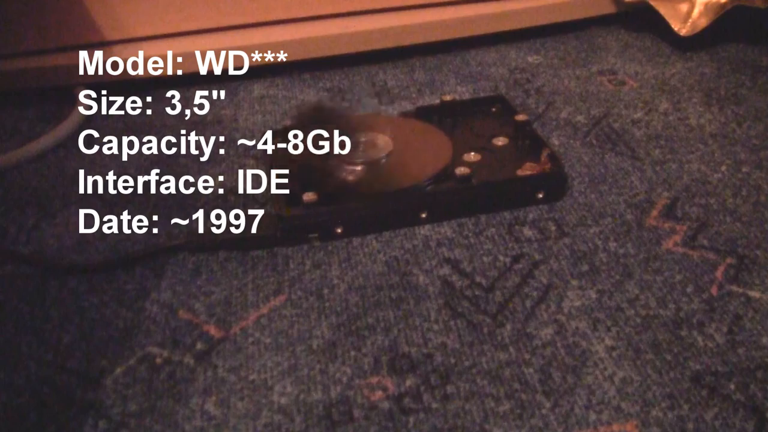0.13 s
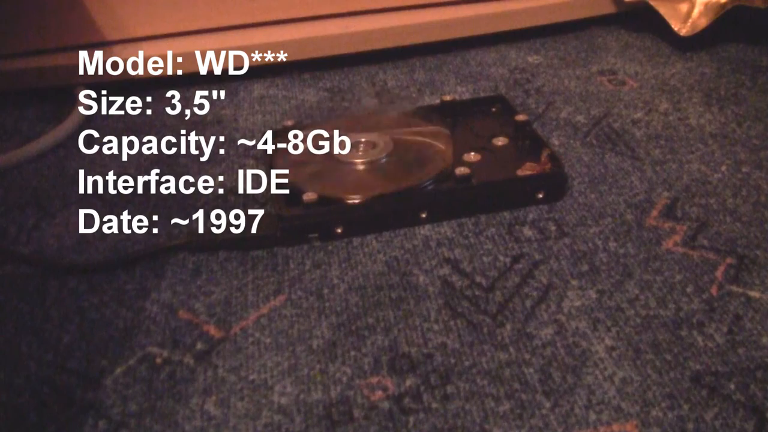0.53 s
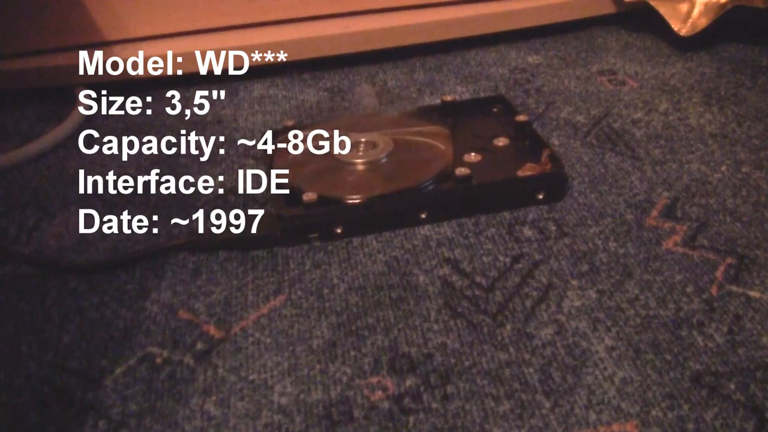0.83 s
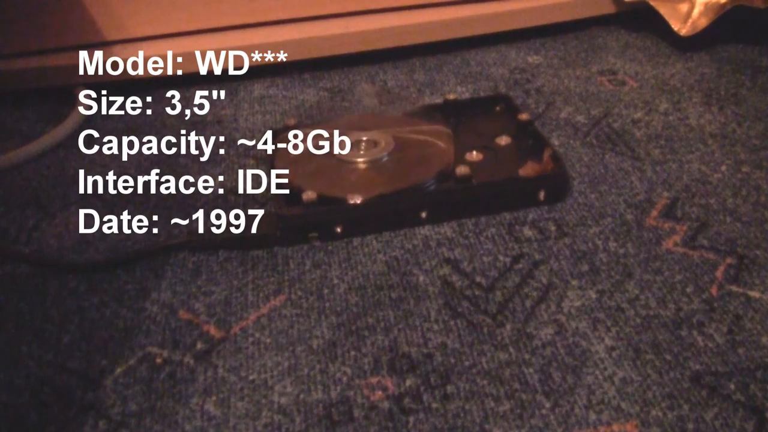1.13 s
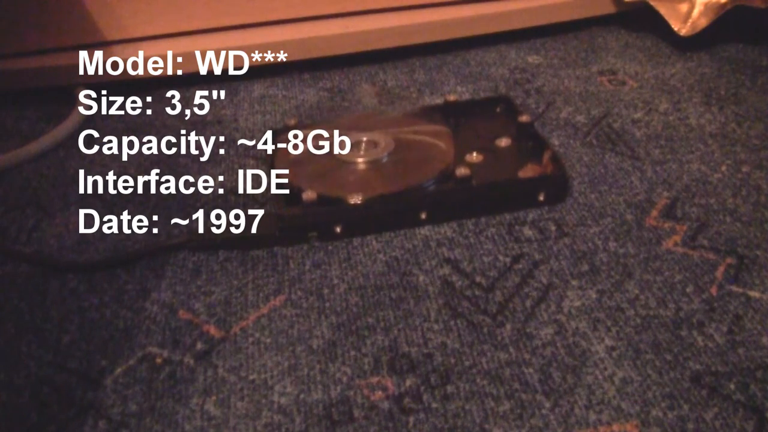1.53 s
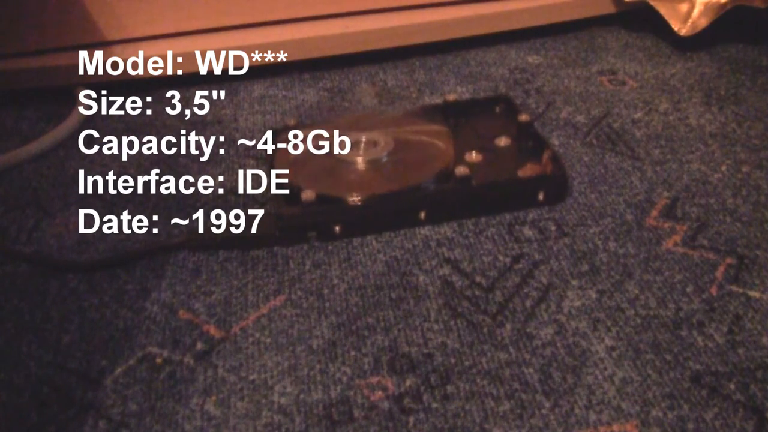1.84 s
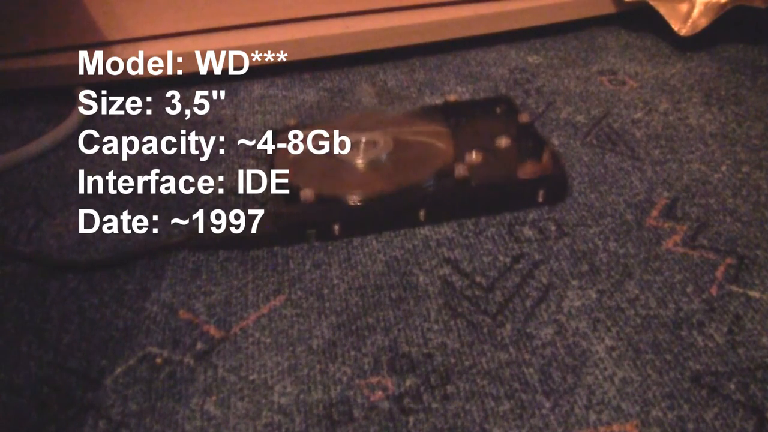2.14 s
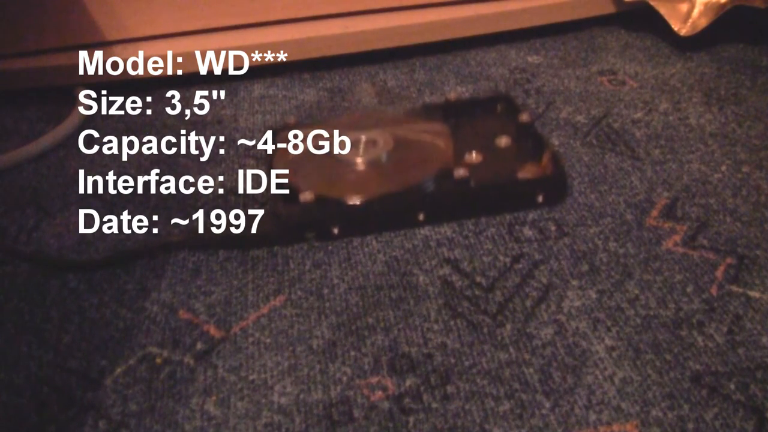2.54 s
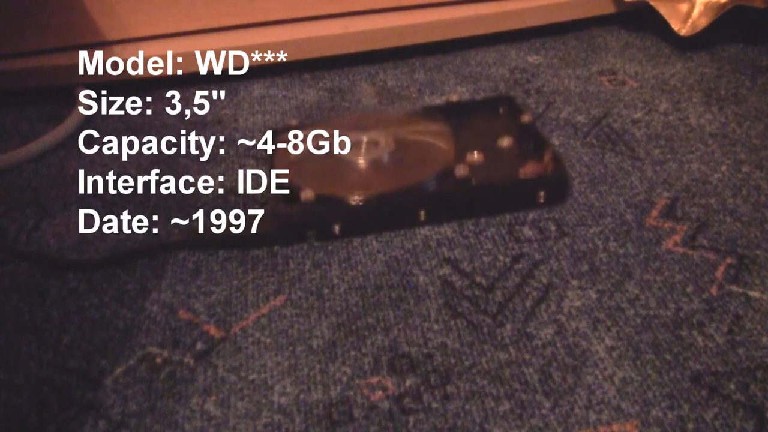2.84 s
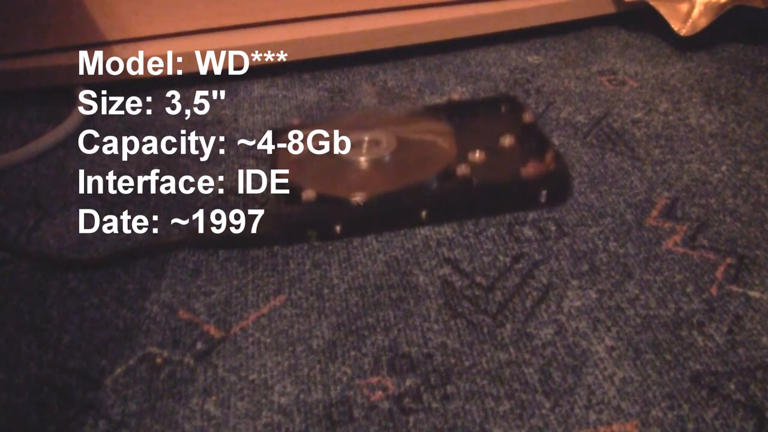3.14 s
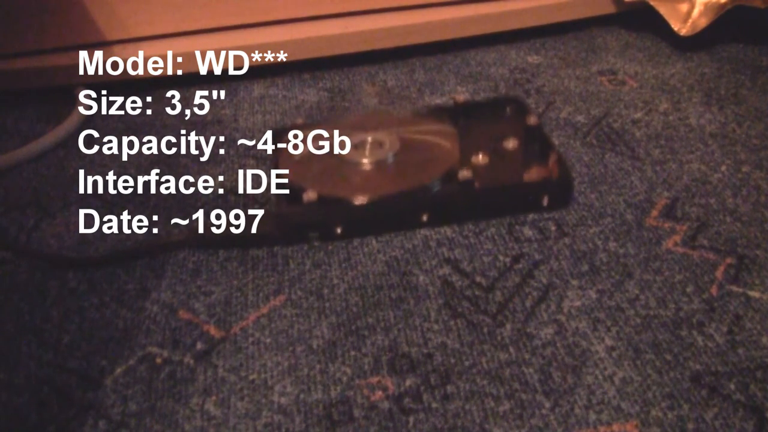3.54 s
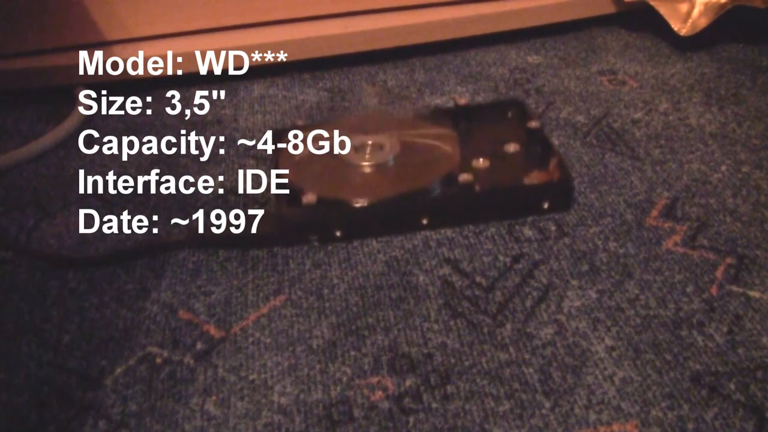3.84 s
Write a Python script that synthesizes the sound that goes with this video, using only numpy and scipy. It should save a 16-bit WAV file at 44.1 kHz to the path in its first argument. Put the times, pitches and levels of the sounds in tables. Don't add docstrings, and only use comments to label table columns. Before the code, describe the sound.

An opened hard drive starts up close to the microphone in a quiet room. After brief silence, faint hiss, thin high whistling and tiny ticks begin around 0.2 seconds, with a short scrape near 0.5. The platter then accelerates, its grinding whine and hum rising in pitch and loudness until about 2.5 seconds, then nearly levelling into a rough, hissing roar. Fluttering air and low thuds punctuate it, mostly after 2.3 seconds.

```python
import sys
import numpy as np
from scipy import signal
from scipy.fft import rfft, irfft, next_fast_len
from scipy.io import wavfile
from scipy.ndimage import uniform_filter1d, map_coordinates

SR = 44100
rng = np.random.default_rng(int(sys.argv[2]) if len(sys.argv) > 2 else 0)


def transcribe(u):
    v = np.clip(np.atleast_2d(u).T, -1, 1)
    q = np.round(v * 32767).astype(np.int16)
    wavfile.write(sys.argv[1], SR, q)


def gain_from_decibels(decibels):
    exponent = np.asarray(decibels, float) / 20
    return 10 ** exponent


N = 176400
TIME = np.arange(N) / SR
BALLS_PER_TURN = 4.83

# frequency in Hz, level in dB per Hz.
GRIND_COLOUR = [(530, -23), (900, -2), (1560, -5), (2070, -3), (2250, -3), (3180, 1), (4180, -1.5),
                (5020, -3), (8000, -16.5), (10400, -20), (17600, -120)]


def unit(x):
    return x / np.sqrt(np.mean(x ** 2) + 1e-20)


def along(points, hz):
    f, v = np.transpose(points)
    return np.interp(np.log(hz + 1), np.log(f + 1), v)


def wobble(rate):
    coarse = np.arange(0, N + 16, 16)
    knots = rng.standard_normal(int(N * rate / SR) + 4)
    curve = map_coordinates(knots, [coarse * rate / SR], mode="nearest")
    return np.interp(np.arange(N), coarse, curve)


def unsteady_tone(phase, width_hz):
    return unit(wobble(width_hz) * np.sin(phase) + wobble(width_hz) * np.cos(phase))


def filtered(x, response):
    m = next_fast_len(N + SR // 2)
    return irfft(rfft(x, m) * response(np.fft.rfftfreq(m, 1 / SR)), m)[..., :N]


def noise(spectrum, patchy_db):
    z = signal.stft(rng.standard_normal(N), nperseg=512)[2]
    patches = uniform_filter1d(rng.standard_normal(z.shape), size=5, axis=0)
    patches = uniform_filter1d(patches, size=10, axis=1)
    x = signal.istft(z * gain_from_decibels(patchy_db * unit(patches)), nperseg=512)[1][:N]
    return unit(filtered(x, lambda hz: gain_from_decibels(along(spectrum, hz))))


def room():
    # frequency in Hz, level in dB per Hz.
    colour = [(15, -54), (25, -15), (129, -3.5), (202, -3), (242, -1), (358, -11), (502, -9), (1040, -13.5),
              (12800, -33), (16600, -68), (22000, -120)]
    # frequency in Hz, likeness (1 is the same).
    likeness = [(60, 0.91), (170, 0.88), (500, 0.055), (1460, 0.034), (4250, 0.41), (12300, 0.18)]

    def angle(hz):
        return np.arccos(np.clip(along(likeness, hz), -1, 1)) / 2

    mid = filtered(noise(colour, patchy_db=1.0), lambda hz: np.cos(angle(hz)))
    side = filtered(noise(colour, patchy_db=3.0), lambda hz: np.sin(angle(hz)))
    return gain_from_decibels(-49.5) * np.array([mid + side, mid - side])


def driver_whistle():
    # frequency in Hz, width in Hz, level in dB.
    lines = [(7130, 90, -69), (7760, 60, -71), (8640, 120, -72), (10500, 500, -73), (12500, 300, -82)]
    start_s = .212
    total = sum(gain_from_decibels(db) * unsteady_tone(2 * np.pi * hz * TIME, width) for hz, width, db in lines)
    return total * (TIME > start_s)


def coil_ticks():
    # start in seconds, level in dB.
    snaps = [
        (.212, -60),
        (.247, -57),
        (.262, -59),
        (.275, -55),
        (.313, -52),
        (.33, -48),
        (.342, -54),
        (.39, -56),
        (.56, -47),
    ]
    # frequency in Hz, level in dB.
    colour = [(1500, -20), (3500, 12), (6000, -10), (9000, -2), (11000, -9), (14000, -13)]
    fade_s = 0.0078
    level = sum(gain_from_decibels(db - 60 * np.abs(TIME - s) / fade_s) * (TIME > s) for s, db in snaps)
    return level * unit(filtered(rng.standard_normal(N), lambda hz: gain_from_decibels(along(colour, hz))))


def platter_scrape():
    # frequency in Hz, level in dB per Hz.
    colour = [(180, -27), (300, -5), (411, -5), (458, -17), (553, -11), (914, -6), (3810, -11.5),
              (12800, -35), (16600, -62), (22000, -120)]
    # middle in seconds, half length in seconds, level in dB.
    strokes = [
        (0.39, 0.012, -50.5),
        (0.492, 0.041, -43),
    ]
    level = sum(gain_from_decibels(db) * np.exp(-.5 * ((TIME - s) / half) ** 2) for s, half, db in strokes)
    roughness = gain_from_decibels(1.5 * wobble(170))
    return level * unit(noise(colour, patchy_db=1.2) * roughness)


def spin():
    # time in seconds, balls passing in Hz, bearing load in dB.
    speed_up = [(0.8, 97.3, -4), (0.85, 110.2, -2), (1.16, 172, 1.5), (1.37, 206, 2), (1.52, 230.3, 2),
                (1.74, 261.3, 1.5), (2.06, 299.5, 0.5), (2.64, 334.7, 0.5), (2.98, 347.5, -0.5),
                (3.46, 358.9, 0), (4.0, 362, -0.5)]
    start_s = .5
    s, hz, load_db = np.transpose([(start_s, 1, 0)] + list(speed_up))
    ball_hz = uniform_filter1d(np.interp(TIME, s, hz), size=SR // 8, mode="nearest")
    turn_hz = ball_hz / BALLS_PER_TURN
    speed_db = 20 * np.log10(turn_hz / turn_hz.max())
    return np.cumsum(turn_hz) / SR, speed_db, np.interp(TIME, s, load_db)


def rim_hiss(speed_db):
    # frequency in Hz, level in dB per Hz.
    colour = [(2940, -37), (5000, 5), (5900, -7), (6760, -4), (8040, -13.5), (8870, -8.5), (10000, -12.5),
              (12800, -30), (16600, -68), (22000, -120)]
    top_hz = 12700
    hiss = filtered(noise(colour, patchy_db=3.1), lambda hz: 1 / (1 + (hz / top_hz) ** 40))
    return hiss * gain_from_decibels(-28.5 + 6.64 * speed_db + 0.27 * wobble(29.9))


def air_thuds():
    # middle in seconds, peak level in dB, pitch in Hz.
    thuds = [(1.234, -25, 181), (1.261, -20, 250), (1.274, -24, 200), (1.286, -17, 298), (1.309, -25, 200),
             (1.335, -24, 180), (1.386, -20, 334), (2.355, -8, 447), (2.419, -9, 502.7),
             (2.611, -10.5, 380), (2.644, -8, 448), (2.71, -7.5, 334), (2.89, -15, 480),
             (3.146, -6.5, 448.4), (3.567, -6.5, 453)]
    total = np.zeros(N)
    for s, db, hz in thuds:
        v = np.pi * hz * (TIME - s)
        total -= gain_from_decibels(db) * (1 - 2 * v * v) * np.exp(-v * v)
    return total


def air_flap(turns, speed_db):
    # frequency in Hz, level in dB per Hz.
    colour = [(24, -39), (40, -23.5), (102, -4), (145, -7.5), (194, -3), (619, 0), (1050, -14),
              (1170, -8.5), (1800, -18.5), (2340, -48), (3960, -120)]
    lumps = gain_from_decibels(0.5 * wobble(90) - 0.5 * wobble(11))
    once_a_turn = 1 + 0.068 * np.cos(2 * np.pi * turns)
    flap = unit(noise(colour, patchy_db=1.5) * lumps * once_a_turn)
    return flap * gain_from_decibels(-20.5 + 3.36 * speed_db)


def platter_hum(turns, speed_db):
    # multiple of the turning rate, level in dB.
    orders = [(1, -34.5), (1.5, -40.5), (2, -29), (3, -37), (5, -43), (6, -36), (7, -38), (8, -41),
              (16, -78)]
    # frequency in Hz, gain in dB.
    carpet = [(50, -9), (66, -3), (78, -0.5), (90, 1.5), (100, -5.5), (113, 1.5), (150, 2), (700, 4)]
    grows, overtone_grows = 2.25, 0.19
    hum = np.zeros(N)
    for k, db in orders:
        level_db = db + overtone_grows * k * speed_db + 1.2 * wobble(9.2)
        hum += np.sqrt(2) * gain_from_decibels(level_db) * np.sin(2 * np.pi * k * turns + rng.uniform(0, 6.27))
    return filtered(hum * gain_from_decibels(grows * speed_db), lambda hz: gain_from_decibels(along(carpet, hz)))


def casting(hz):
    # frequency in Hz, width in Hz, gain in dB.
    rings = [(1180, 160, -3.5), (1695, 27, 12), (1930, 63, 7), (2014, 17, 11), (2101, 94, 8), (2530, 35, 9),
             (2790, 63, 9.5), (3092, 104, 7), (3257, 110, 6.5), (3528, 140, 10), (3880, 210, 9),
             (4580, 310, 6), (4946, 33, 4.5), (6840, 160, 8.5)]
    peaks = sum((gain_from_decibels(db) ** 2 - 1) / (1 + (2 * (hz - centre) / width) ** 2) for centre, width, db in rings)
    return np.sqrt(1 + peaks)


def bearing_grind(speed_db, load_db):
    grind_db, rub_db, rub_s = -21.5, -58, 0.525
    bright_hz = 2550
    grind = unit(filtered(noise(GRIND_COLOUR, patchy_db=0.5), casting))
    grind = grind * gain_from_decibels(grind_db + .4 * wobble(4.4) + 0.9 * wobble(70))
    dull = filtered(grind, lambda hz: 1 / (1 + (hz / bright_hz) ** 4))
    bright = grind - dull
    rub = bright * gain_from_decibels(rub_db - grind_db) * np.clip((TIME - rub_s) / 0.04, 0, 1)
    rolling = dull + bright * gain_from_decibels(1.28 * speed_db)
    return rolling * gain_from_decibels(1.62 * speed_db + load_db) + rub


def bearing_whine(turns, speed_db, load_db):
    # multiple of the ball rate, level in dB.
    main_orders = [(6, -39), (7, -42), (8, -41), (9, -38), (11, -47)]
    low_hz = 1540
    phase = 2 * np.pi * BALLS_PER_TURN * turns + 0.052 * wobble(40)
    orders = [(k, db + 1.2 * speed_db) for k, db in main_orders]
    orders += [(k, -53 + 0.4 * speed_db) for k in (10, *range(12, 24))]
    tones = sum(gain_from_decibels(db + 2.6 * wobble(9)) * np.sin(k * phase + k * k) for k, db in orders)
    swing = 1 + 2 * gain_from_decibels(-14) * np.cos(2 * np.pi * turns)

    def tone_path(hz):
        ringing = casting(hz) ** 1.5
        return ringing * gain_from_decibels(along(GRIND_COLOUR, hz)) / (1 + (low_hz / (hz + 1)) ** 8)

    tones = filtered(tones * swing, tone_path)
    ridge = unsteady_tone(14.3 * phase, width_hz=900) * gain_from_decibels(-34.5 + 1.18 * speed_db)
    ridge = filtered(ridge, lambda hz: casting(hz) * gain_from_decibels(along(GRIND_COLOUR, hz)))
    return (tones + ridge) * gain_from_decibels(load_db)


def scene():
    # frequency in Hz, side over middle in dB.
    spread = [(40, -42), (170, -31), (500, -24.5), (1460, -19.5), (4250, -16.5), (9000, -15.5), (13000, 1)]
    echo_s, lean_db = 0.59, .15
    turns, speed_db, load_db = spin()
    drive = driver_whistle() + coil_ticks() + platter_scrape()
    drive += rim_hiss(speed_db) + air_thuds() + air_flap(turns, speed_db) + platter_hum(turns, speed_db)
    drive += bearing_grind(speed_db, load_db) + bearing_whine(turns, speed_db, load_db)
    echo = rng.standard_normal(SR // 3) * gain_from_decibels(-60 * np.arange(SR // 3) / SR / echo_s)
    reflected = signal.fftconvolve(drive, echo / np.linalg.norm(echo))[:N]
    side = filtered(reflected, lambda hz: gain_from_decibels(along(spread, hz)))
    return np.array([drive + side, drive - side]) * gain_from_decibels([[lean_db], [-lean_db]]) + room()


def roll_off(x):
    return signal.sosfilt(signal.butter(12, 15250, fs=SR, output="sos"), x)


def record(dry):
    low_hz, open_s, fade_s = 63, .166, .006
    mic = filtered(dry, lambda hz: 1 / np.sqrt(1 + (low_hz / (hz + 1)) ** 4))
    return roll_off(mic * np.clip((TIME - open_s) / fade_s, 0, 1))


dry = scene()
out = record(dry)
transcribe(out)
```